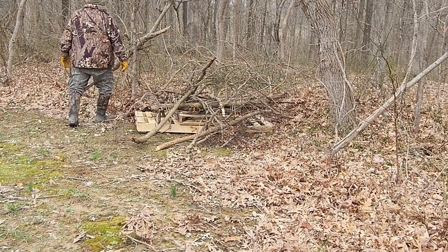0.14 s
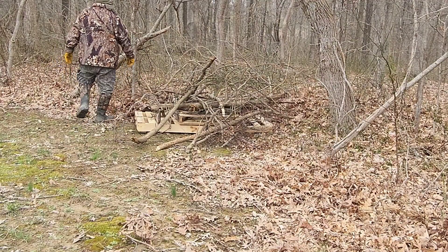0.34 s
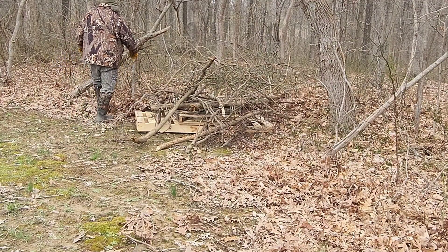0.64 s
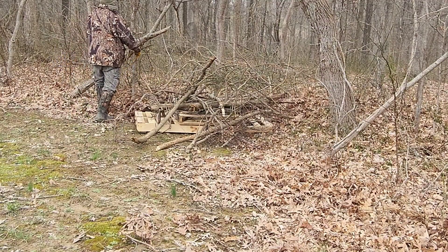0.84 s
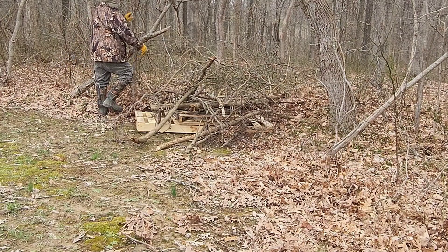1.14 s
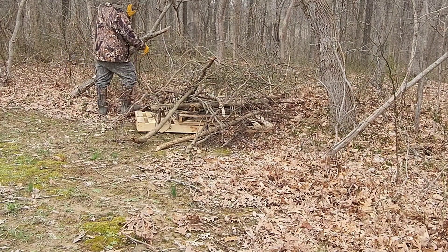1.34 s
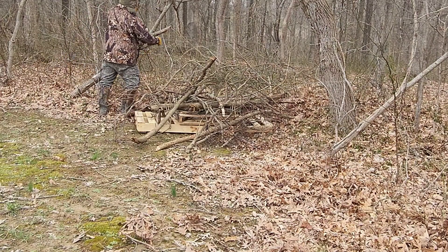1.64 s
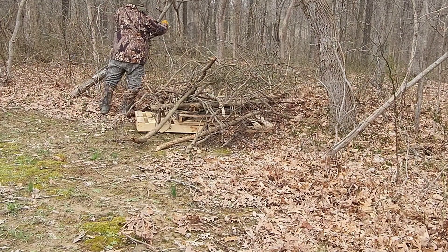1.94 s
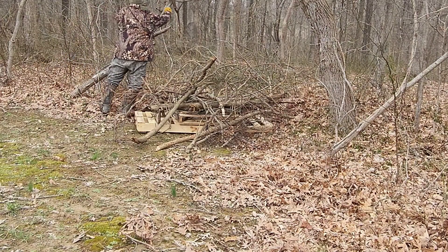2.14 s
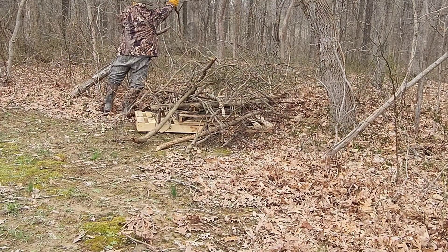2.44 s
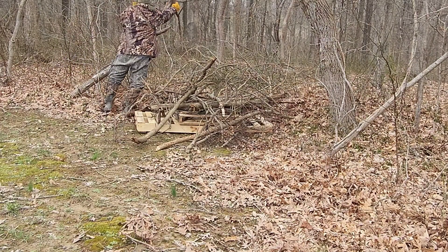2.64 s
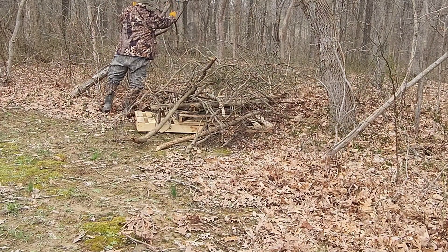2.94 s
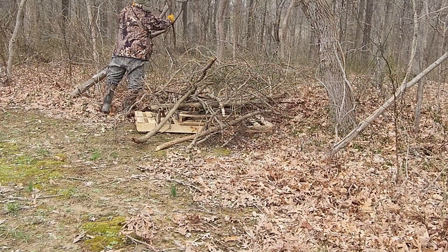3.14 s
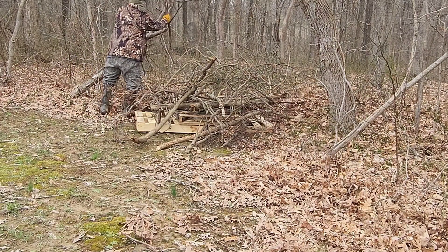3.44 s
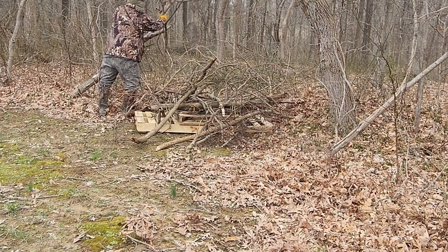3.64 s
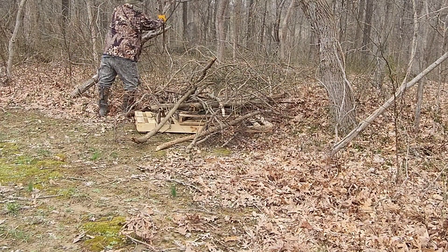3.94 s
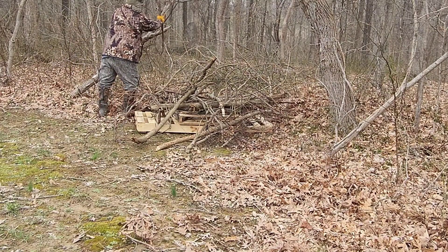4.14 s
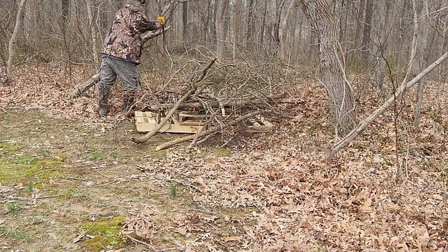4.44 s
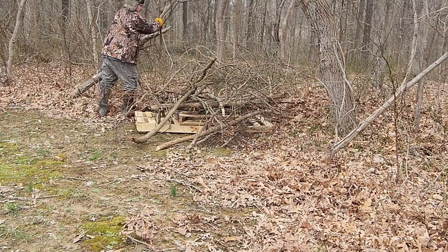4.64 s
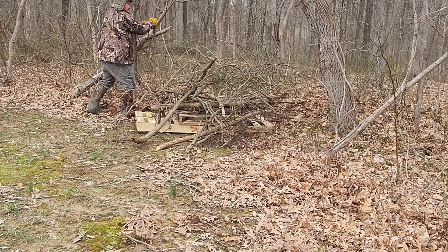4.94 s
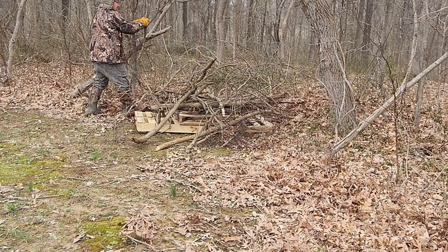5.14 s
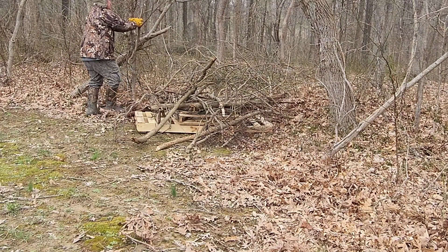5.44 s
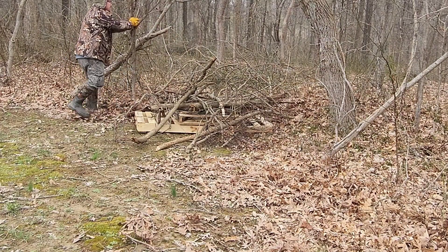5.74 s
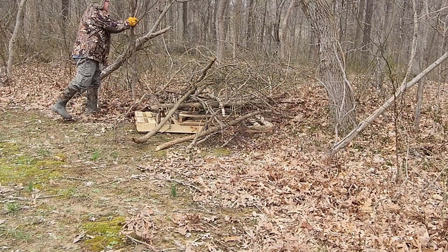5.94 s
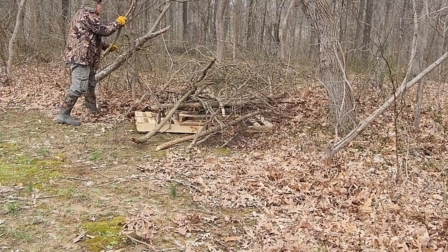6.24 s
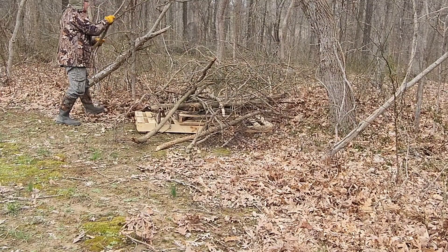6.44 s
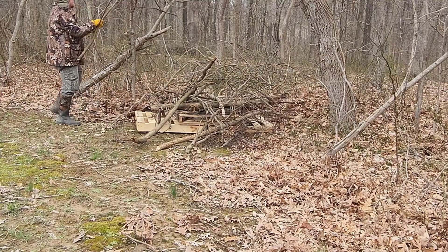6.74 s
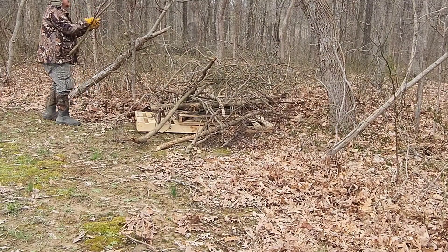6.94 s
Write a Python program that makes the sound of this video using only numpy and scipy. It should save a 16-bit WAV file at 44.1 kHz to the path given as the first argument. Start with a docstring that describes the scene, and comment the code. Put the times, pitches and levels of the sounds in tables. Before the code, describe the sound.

Dry litter rustles under boots while a limb trails through it almost continuously. Brittle twigs tick and snap, sparsely for the first five seconds, then one hard crack leads into a busy burst of snapping, rasping bark and crisp leaf sweeps. Low gusts buffet the microphone over a faint woodland hush; each crack leaves a diffuse bright tail among the trunks.

```python
"""In a wood, someone walks through dry leaves and hauls on a dead limb beside a brush pile.
Wind rumbles on the microphone as low-passed noise; litter and bark crackle as random trains of decaying grains.
Brittle twigs snap as short ragged noise bursts through a resonance; the limb knocks in damped sine modes.
Decaying noise, nearly independent in the two channels, gives each crack and tick the trunks' long bright tail."""
import sys
import numpy as np
from scipy import signal
from scipy.fft import rfft, irfft, next_fast_len
from scipy.io import wavfile

SR = 44100
rng = np.random.default_rng(int(sys.argv[2]) if len(sys.argv) > 2 else 0)


def to_wav(sig):
    """Store sig (one row per channel, or 1-D mono) as 16-bit WAV at the path in sys.argv[1].

    Samples outside -1..1 are clipped; the rate is SR.
    """
    pcm = np.clip(np.atleast_2d(sig), -1, 1) * 32767
    pcm = np.round(pcm).astype(np.int16)
    wavfile.write(sys.argv[1], SR, pcm.T)  # frames by channels


N = 313330
TIME = np.arange(N) / SR

# All levels are those ahead of the colouring by the microphone ports.
# Gusts of bell-shaped envelope: [t of the height/s, standard deviation/s, level/dB]
GUSTS = [(0.3, 0.15, -50.5), (0.849, 0.19, -49.5), (1.5, 0.15, -51.5), (1.77, 0.045, -44.5),
         (1.971, 0.026, -36.5), (2.33, 0.33, -48.5), (2.64, 0.028, -46), (3.75, 0.093, -43),
         (4.25, 0.64, -47.5), (4.86, 0.2, -37.5), (5.43, 0.037, -38.5), (5.75, 0.072, -42),
         (6.03, 0.056, -40.5), (6.332, 0.057, -39), (6.599, 0.34, -43), (6.94, 0.041, -36)]
# Spectrum of the wind's buffeting on the microphone: [f/Hz, relative level/dB]
BUFFET = [(12, -24), (28, -6), (45, 3.5), (75, -0.5), (120, -7.5), (180, -21.5), (300, -32), (800, -67.5)]
# Spectrum of the steady hush of the wood: [f/Hz, relative level/dB]
WOODLAND_AIR = [(40, 7), (150, -3), (290, 1), (450, -10), (700, -5.5), (1200, -21), (2400, -29.5),
                (5500, -25), (8000, -52), (16000, -50)]
# Strokes of a stick rasping on the ground: [start t/s, time under pressure/s, level/dB, wood f/Hz, its width/Hz]
RASPS = [(0.0, 0.09, -53, 2140, 149), (0.2, 0.056, -51, 3600, 1200), (1.18, 0.08, -48, 2130, 910),
         (6.18, 0.12, -43, 3000, 1200), (6.62, 0.11, -42, 3150, 1200)]
# Fine twigs scraping past each other: [start t/s, time under pressure/s, level before panning/dB]
SCRAPES = [(0.0, 0.27, -62), (1.19, 0.049, -43.5), (3.26, 0.34, -58), (3.669, 0.077, -49),
           (6.069, 0.067, -50.5), (6.3, 0.036, -28), (6.5, 0.34, -40), (6.93, 0.16, -44.5)]
# Boots and branches sweeping the litter:
# [start t/s, time under pressure/s, rustle level before trims/dB, weight on the layer below/dB]
SWEEPS = [(0.03, 0.092, -61.5, 7.5), (0.18, 0.027, -52.5, -0.5), (0.763, 0.11, -39.5, 1),
          (1.22, 0.63, -51, 2.5), (1.368, 0.21, -40, 2.5), (1.68, 0.098, -50.5, -5), (2.74, 0.23, -54, 0.5),
          (3.7, 0.06, -43, 0.5), (4.568, 0.047, -47.5, -9), (4.87, 0.26, -43.5, 1), (5.42, 0.2, -42.5, -10),
          (5.53, 0.17, -41, 2.5), (5.701, 0.18, -45.5, 1), (6.17, 0.21, -40.5, 4.5),
          (6.478, 0.11, -39.5, 3), (6.702, 0.24, -35.5, -4), (6.98, 0.21, -48, 4.5)]
# The limb trailing through the leaves in two long strokes: columns as in SWEEPS
TRAILS = [(0.7, 3.706, -55.5, 0.0071), (4.4, 2.1, -50.5, 0)]
# Spectrum of crisp surface leaves: [f/Hz, relative level/dB]
LEAF_RUSTLE = [(1500, -11), (2600, -15.5), (3600, -12), (4500, -1), (5600, 1), (6600, -5.5), (8300, -7.5),
               (10000, -13.5), (11700, -8), (16000, -19.5)]
# Spectrum of the crushed layer below: [f/Hz, relative level/dB]
LEAF_CRUSH = [(120, -11), (300, -2), (650, -1), (1000, -2), (1550, -3), (2500, -5), (4000, -2), (9000, -69)]
# Spectrum of breaking or rubbing dry wood: [f/Hz, relative level/dB]
DRY_WOOD = [(250, -16), (750, -11), (1050, -6), (2500, -2), (3400, 2.5), (5500, 5), (7500, -5.5),
            (9500, -10.5), (11500, -7), (16000, -19)]
# Twigs flicking against each other unbroken: [t/s, level over the first 3 ms/dB, twig f/Hz]
TICKS = [(0.071, -47.5, 5470), (1.2327, -36, 4500), (1.382, -43.5, 7800), (1.435, -36, 6000),
         (2.1995, -54, 10000), (3.022, -37, 11000), (3.296, -33, 10900), (3.341, -43.5, 11000),
         (3.455, -42, 11100), (3.6755, -39.5, 2500), (3.904, -40, 9700), (5.208, -39, 7950),
         (6.116, -37, 5430), (6.133, -35, 4000), (6.235, -30, 5500), (6.248, -24.5, 4400),
         (6.363, -28.5, 7560), (6.39, -29.5, 4000), (6.77, -24.5, 4970), (6.9925, -33, 11000),
         (7.045, -32, 4500)]
# Blows of the limb against other wood: [t/s, level relative to the modes/dB]
KNOCKS = [(1.232, -3), (1.7955, 5), (2.4712, 0)]
# Modes of the limb: [f/Hz, amplitude level at a 0 dB blow/dB, 60 dB decay time/s]
KNOCK_MODES = [(468, -44.5, 0.044), (995, -23.5, 0.0018)]
# Snapping twigs: [t/s, crack level before panning/dB, length of the break/s, twig f/Hz,
# splinters relative to the crack/dB, left over right/dB]
SNAPS = [(1.794, -24, 0.0027, 5640, -4.5, 0), (2.3738, -25.5, 0.0042, 5350, -8.5, 1.5),
         (3.2621, -30.5, 0.0064, 10230, 6, 1), (3.5799, -23.5, 0.0039, 4500, -3, 0),
         (4.013, -30, 0.0022, 8300, 1.5, 0), (4.161, -36.5, 0.0035, 8040, 2, 0.5),
         (4.249, -31.5, 0.0023, 6530, -0.5, 1), (4.7376, -27, 0.0012, 5060, -5, 1),
         (5.1837, -39, 0.0041, 7400, 0, -1), (5.241, -34, 0.0051, 4770, -6, -1),
         (5.3413, -15, 0.0039, 5700, -6.5, -0.5), (5.5475, -33.5, 0.0045, 7200, 2.5, 1),
         (5.9214, -35.5, .0058, 7100, 1, 1), (6.163, -14, 0.0047, 3800, -7, -1.5),
         (6.2694, -21, 0.0031, 4650, -8, 0), (6.34, -27.5, 0.0022, 8500, 1.5, 0),
         (6.5886, -21.5, 0.0038, 5740, -1, 1.5), (6.62, -16.5, .0024, 4700, -8, 0.5),
         (6.708, -13, 0.0029, 4470, -8.5, 0), (6.8624, -22.5, 0.0027, 5660, -3, 1.5)]
# Body, crack and splinter bands of a snap: [lower edge f/Hz, upper edge f/Hz]
SNAP_BANDS = [(220, 2000), (2000, 8000), (8000, 16000)]
# Response of the left port over the right: [f/Hz, level difference/dB]
LEFT_OVER_RIGHT = [(3400, -1.5), (4400, -5.5), (5400, 0), (6500, 6.5), (7700, 20), (9000, 1.5), (10400, 11),
                   (11700, -4), (13500, 6.5)]

BREEZE_DB, AIR_DB = -60, -58.5
# pressure builds over a fixed time plus a share of the time under pressure
PRESS_S, PRESS_SHARE = .065, .15
# how fast a stroke dies once released: leaves settle, wood stops sooner
SETTLE_DB_PER_S, RASP_STOP_DB_PER_S = 100, 320
SCRAPE_LOW_HZ = 6800
# lower layer: its level under a firm sweep before the weight, and its share of the rustle's swing in dB
FIRM_SWEEP_DB, CRUSH_DB, CRUSH_FOLLOWS = -40, -52.5, 0.61
STALK_T60_S = .018
LEAD_IN_S, FIRST_FIBRES_S = .004, .0003
# body relative to the crack at the typical length of break; longer breaks have more
TYPICAL_BREAK_S, BODY_DB, BODY_DB_PER_DOUBLING = .003, -16, 7.5
RIGHT_LAG_S = 5 / SR
CUTOFF_HZ = 15900


def from_db(db):
    """A level in decibels is twenty times the logarithm of the amplitude ratio."""
    return 10 ** (np.asarray(db) / 20)


def rms_one(x):
    """Effective value: the root of the mean square is scaled to one."""
    return x / np.sqrt(np.mean(x ** 2) + 1e-20)


def together_db(gains):
    """Energy addition: the powers of uncorrelated sounds add."""
    return 10 * np.log10(sum(g ** 2 for g in gains) + 1e-12)


def drift(rate, size=N):
    """Random modulation: straight lines join random values, `rate` a second, of unit rms."""
    knots = rng.standard_normal(4096)
    return rms_one(np.interp(TIME[:size] * rate, np.arange(len(knots)), knots))


def colour(x, spectrum):
    """Minimum phase: folding the cepstrum gives the causal filter of a given magnitude spectrum."""
    size = 2 * next_fast_len(x.shape[-1] // 2 + 4096)
    hz, level_db = np.transpose(spectrum)
    grid = np.maximum(np.arange(size // 2 + 1) * SR / size, 1)
    magnitude = from_db(np.interp(np.log(grid), np.log(hz), level_db))
    cepstrum = irfft(np.log(magnitude))
    cepstrum[1:size // 2] *= 2
    cepstrum[size // 2 + 1:] = 0
    response = np.exp(rfft(cepstrum))
    return irfft(rfft(x, size) * response)[..., :x.shape[-1]]


def pair(three, alike):
    """Interchannel coherence: a shared signal and two private ones set the correlation."""
    alike = np.clip(alike, 0, 1)
    return np.sqrt(alike) * three[0] + np.sqrt(1 - alike) * three[1:]


def pan(left_db):
    """Interchannel level difference, split equally between left and right."""
    return from_db(np.array([[.5], [-.5]]) * left_db)


def wind():
    """Turbulence: eddies buffet the microphone as low-frequency noise over a steady hush."""
    gusts = [from_db(db) * np.exp(-.5 * ((TIME - s) / sigma_s) ** 2) for s, sigma_s, db in GUSTS]
    gust_db = together_db([from_db(BREEZE_DB), *gusts])
    buffet = rms_one(colour(pair(rng.standard_normal((3, N)), alike=0.7), BUFFET))
    air = rms_one(colour(pair(rng.standard_normal((3, N)), alike=0.58), WOODLAND_AIR))
    lumps_db = 3.0 * drift(rate=16)
    return from_db(gust_db + lumps_db) * pan(left_db=1.0) * buffet + from_db(AIR_DB) * air


def grains(per_s, spread_db, grain_s, alike):
    """Shot noise: small fractures at random moments, most faint, each a quickly dying fizz."""
    sizes = from_db(spread_db * np.minimum(rng.exponential(1, N), 5))
    born = rng.random(N) < per_s / SR
    decay = np.exp(-2 / (grain_s * SR))   # power falls twice as fast as amplitude
    power = signal.lfilter([1], [1, -decay], born * sizes ** 2 + 1e-18)
    return rms_one(np.sqrt(power) * pair(rng.standard_normal((3, N)), alike))


def stroke(start_s, held_s, level_db, fall_db_per_s):
    """Friction under load: the gain builds with pressure, holds, and falls exponentially on release."""
    t = TIME - start_s
    build = np.clip(t / (PRESS_S + PRESS_SHARE * held_s), 0, 1)
    release_db = fall_db_per_s * np.maximum(t - held_s, 0)
    return np.sin(np.pi / 2 * build) ** 2 * from_db(level_db - release_db)


def resonate(x, hz, width_hz):
    """Simple resonance: a damped pole pair passes a band about its pitch, with unit gain on top."""
    r = np.exp(-np.pi * width_hz / SR)
    zeros = np.array([1, 0, -1]) * (1 - r * r) / 2
    poles = [1, -2 * r * np.cos(2 * np.pi * hz / SR), r * r]
    return signal.lfilter(zeros, poles, x)


def rasp():
    """Stick-slip: quick slips of bark crunch, and each stroke excites a resonance of its own."""
    slips = grains(per_s=700, spread_db=3.0, grain_s=0.0012, alike=0.4)
    bark = from_db(1) * rms_one(colour(slips, DRY_WOOD))
    out = 0
    for s, held_s, db, hz, width_hz in RASPS:
        wood = rms_one(resonate(slips, hz, width_hz))
        out = out + stroke(s, held_s, db, RASP_STOP_DB_PER_S) * rms_one(wood + bark)
    return out


def scrapes():
    """Stick-slip of thin twigs: they catch and slip in quick ticks, mostly high in frequency."""
    slips = colour(grains(per_s=500, spread_db=4.0, grain_s=0.002, alike=0.3), DRY_WOOD)
    high_pass = signal.butter(2, SCRAPE_LOW_HZ, "high", fs=SR, output="sos")
    bright = rms_one(signal.sosfilt(high_pass, slips))
    return sum(stroke(*row, RASP_STOP_DB_PER_S) for row in SCRAPES) * pan(left_db=2.0) * bright


def stalks(count=1000, order=5):
    """Free vibration: leaf stalks and fine twigs flick at random and ring in a few damped modes."""
    t = TIME[:SR // 64]
    out = np.zeros((2, N + len(t)))
    starts = rng.integers(0, N, count)
    sizes = from_db(2.0 * np.minimum(rng.exponential(1, count), 4))
    pitches = rng.uniform(924, 15350, (count, order, 1))
    phases = rng.normal(0, 0.5, (count, 2, order, 1))   # each reaches the two ports a little differently
    for start, size, hz, phase in zip(starts, sizes, pitches, phases):
        modes = np.sin(2 * np.pi * hz * t + phase).sum(axis=1)
        out[:, start:start + len(t)] += size * from_db(-60 * t / STALK_T60_S) * modes
    return out[:, :N]


def leaves():
    """Crackling noise: leaves and stalks rustle, the layer below crunches, ticks quicken with pressure."""
    strokes = [(stroke(s, held_s, db, SETTLE_DB_PER_S), weight_db)
               for s, held_s, db, weight_db in SWEEPS + TRAILS]
    rustle_db = together_db(gain for gain, _ in strokes)
    # the lower layer swings less than the rustle
    crush_gains = [from_db(weight_db) * (gain / from_db(FIRM_SWEEP_DB)) ** CRUSH_FOLLOWS
                   for gain, weight_db in strokes]
    crush_db = CRUSH_DB + together_db(crush_gains)
    pressure = from_db(0.86 * (rustle_db - rustle_db.max()))   # 1 at the hardest

    rustle = colour(grains(per_s=3000, spread_db=2.2, grain_s=0.0006, alike=0.45), LEAF_RUSTLE)
    crush = colour(grains(per_s=1200, spread_db=3.0, grain_s=0.002, alike=0.7), LEAF_CRUSH)
    crackle = colour(grains(per_s=25 + 90 * pressure, spread_db=2.0, grain_s=0.005, alike=0.9), DRY_WOOD)
    flicks = colour(stalks(), LEAF_RUSTLE)
    crisp = from_db(-2) * rms_one(rustle) + from_db(-9) * rms_one(crackle) + from_db(-8) * rms_one(flicks)
    return from_db(rustle_db) * crisp + from_db(crush_db) * rms_one(crush)


def scatter(t):
    """Diffuse reverberation: noise decays fast for ground and brush, over half a second for the trunks."""
    echoes = pair(rng.standard_normal((3, len(t))), alike=0.17)
    echoes = echoes * (1 - np.exp(-t / 0.0046))   # echoes gather over a few milliseconds
    near = from_db(-4) * rms_one(echoes * from_db(-60 * t / 0.066))
    far = from_db(-5) * rms_one(echoes * from_db(-60 * t / 0.57))
    return near + far


def ticks():
    """Impact excitation: one sharp contact rings a thin twig for an instant and echoes in the wood."""
    t = TIME[:SR // 4]
    out = np.zeros((2, N + SR))
    for s, db, hz in TICKS:
        contact = np.exp(-t / .0006) * pair(rng.standard_normal((3, len(t))), alike=0.88)
        click = rms_one(contact) + from_db(-2) * scatter(t)
        sound = resonate(click, hz, width_hz=3500) + from_db(-7) * colour(click, DRY_WOOD)
        onset_rms = np.sqrt(np.mean(sound[:, t < .003] ** 2))
        start = int(s * SR)
        out[:, start:start + len(t)] += from_db(db) * sound / onset_rms
    return out[:, :N]


def knock():
    """Modal response: each blow excites the limb's heavily damped modes as a dull bump."""
    t = TIME[:SR // 10]
    bump = sum(from_db(db - 60 * t / t60) * np.sin(2 * np.pi * hz * t) for hz, db, t60 in KNOCK_MODES)
    blows = np.zeros(N)
    for s, blow_db in KNOCKS:
        blows[int(s * SR)] = from_db(blow_db)
    return signal.fftconvolve(blows, bump)[:N]


def knotty(spectrum, ripple_db, count):
    """Irregular structure: random peaks and dips, new for each piece of wood, ripple the spectrum."""
    hz, level_db = np.transpose(spectrum)
    grid = np.linspace(np.sqrt(hz[0]), np.sqrt(hz[-1]), count) ** 2
    common_db = np.interp(np.log(grid), np.log(hz), level_db)
    return np.transpose([grid, common_db + ripple_db * rng.standard_normal(count)])


def snap(band_db, length_s, twig_hz):
    """Brittle fracture: a few fibres start, the rest tear raggedly, then the twig rings into the wood."""
    t = TIME[:SR // 2] - LEAD_IN_S
    after = np.maximum(t, 0)
    onset = np.minimum(t, 0) / FIRST_FIBRES_S
    ring_out = np.maximum(after - length_s, 0) / 0.0014
    tear = np.exp(onset - ring_out - after / length_s)
    tear = tear * from_db(3.5 * drift(rate=2623, size=len(t)))
    burst = rms_one(tear * pair(rng.standard_normal((3, len(t))), alike=0.73))
    burst = burst + from_db(4) * resonate(burst, twig_hz, width_hz=720)
    burst = colour(burst, knotty(DRY_WOOD, ripple_db=5.5, count=80))
    burst = burst + colour(scatter(after), DRY_WOOD)   # echoes from all sides even out the twig's own peaks

    out = 0
    for edges, level_db in zip(SNAP_BANDS, band_db):
        band_pass = signal.butter(3, edges, "band", fs=SR, output="sos")
        part = signal.sosfilt(band_pass, burst)
        onset_rms = np.sqrt(np.mean(part[:, (t > 0) & (t < .006)] ** 2))
        out = out + from_db(level_db) * part / onset_rms
    return out


def twigs():
    """Scaling of fracture: each snap has its moment and place, and a longer break has more body."""
    out = np.zeros((2, N + SR))
    for s, crack_db, length_s, twig_hz, splinter_db, left_db in SNAPS:
        doublings = np.log2(length_s / TYPICAL_BREAK_S)
        body_db = crack_db + BODY_DB + BODY_DB_PER_DOUBLING * doublings
        band_db = [body_db, crack_db, crack_db + splinter_db]
        sound = pan(left_db) * snap(band_db, length_s, twig_hz)
        start = int((s - LEAD_IN_S) * SR)
        out[:, start:start + sound.shape[1]] += sound
    return out[:, :N]


def scene():
    """Interaural delay: the work is off to the left, so it reaches the right port a little late."""
    left, right = twigs() + ticks() + leaves() + scrapes() + knock() + rasp()
    late_right = np.interp(TIME - RIGHT_LAG_S, TIME, right)
    return np.array([left, late_right]) + wind()


def record(dry):
    """Receiver response: the two ports share the treble unevenly, and a steep low-pass cuts the top."""
    hz, left_db = np.transpose(LEFT_OVER_RIGHT)
    gains = pan(left_db)
    levels_db = 20 * np.log10(gains / np.sqrt(np.mean(gains ** 2, axis=0)))   # mean power is kept
    ports = [colour(channel, np.transpose([hz, db])) for channel, db in zip(dry, levels_db)]
    low_pass = signal.ellip(10, .1, 80, CUTOFF_HZ, fs=SR, output="sos")
    return signal.sosfilt(low_pass, ports)


dry = scene()
out = record(dry)
to_wav(out)
```